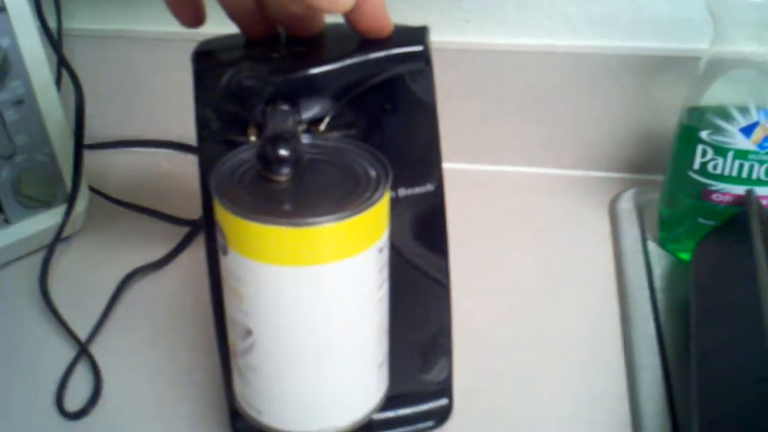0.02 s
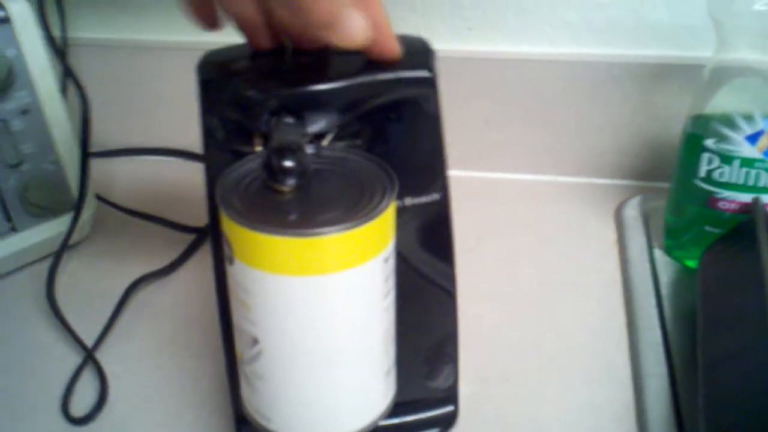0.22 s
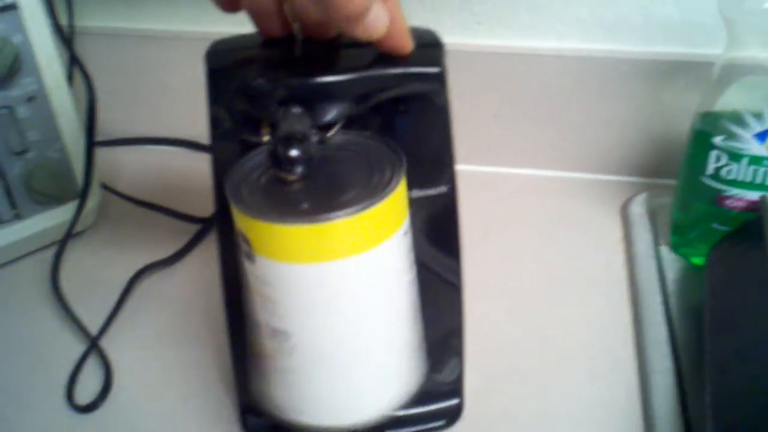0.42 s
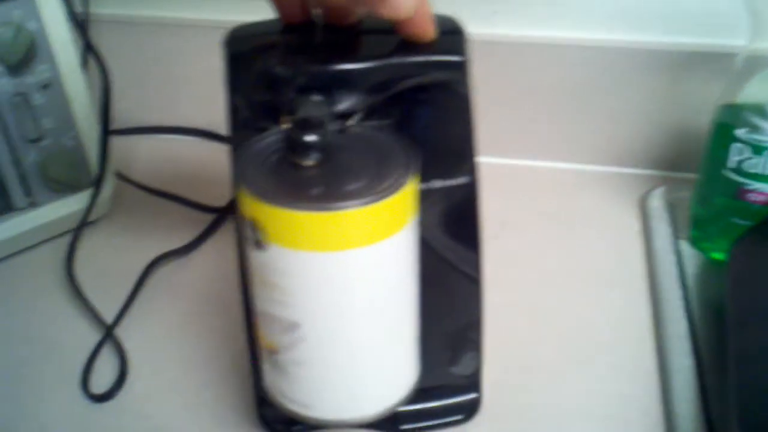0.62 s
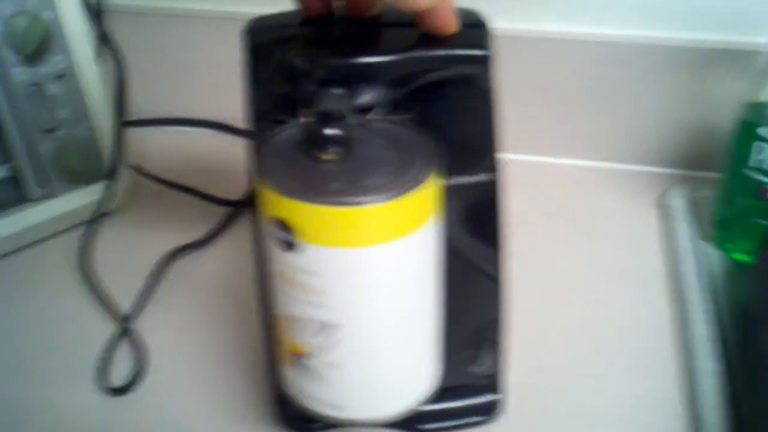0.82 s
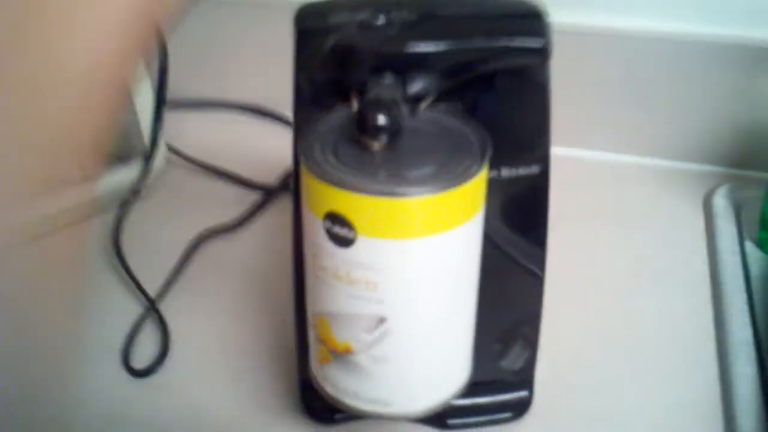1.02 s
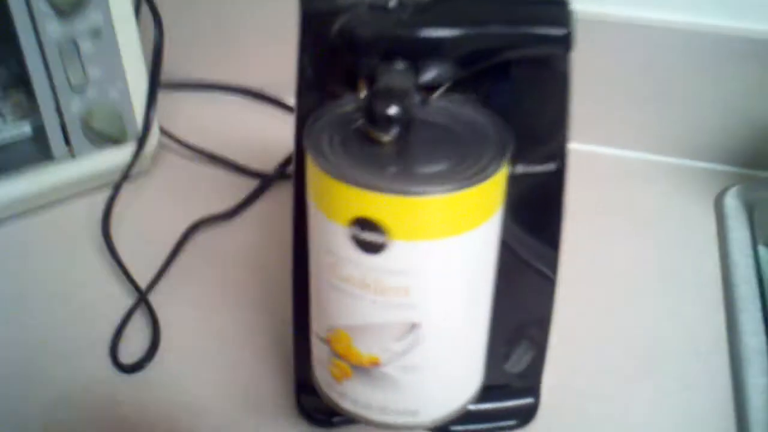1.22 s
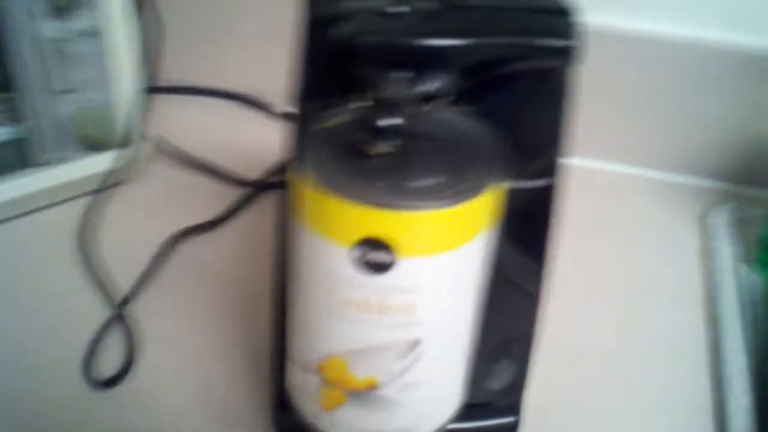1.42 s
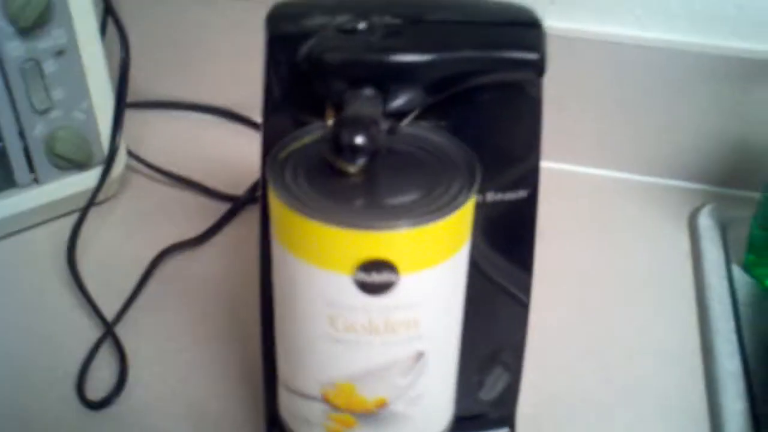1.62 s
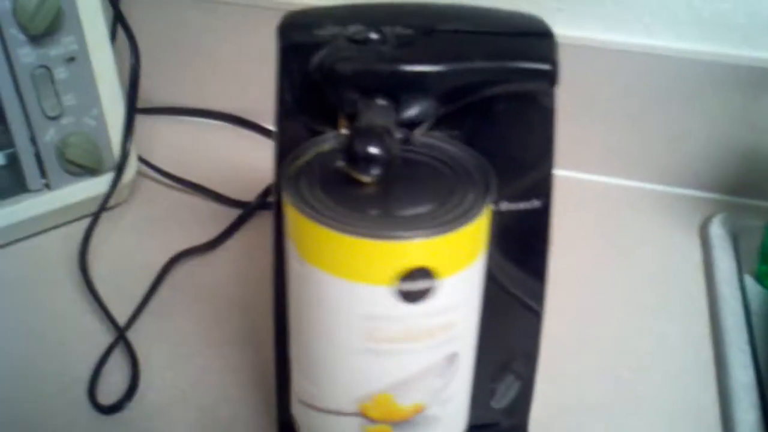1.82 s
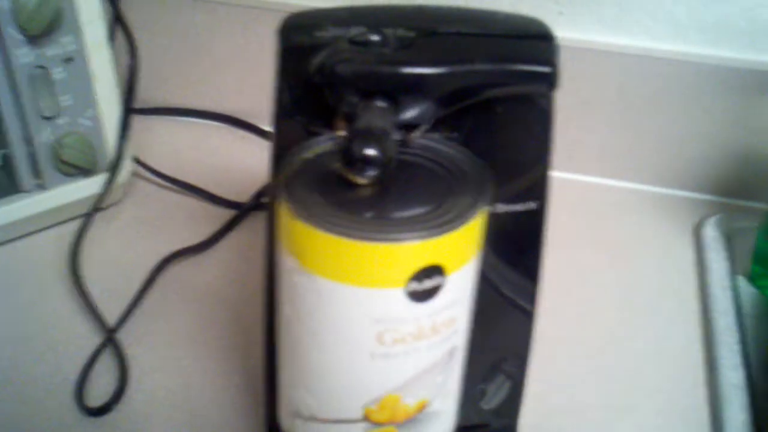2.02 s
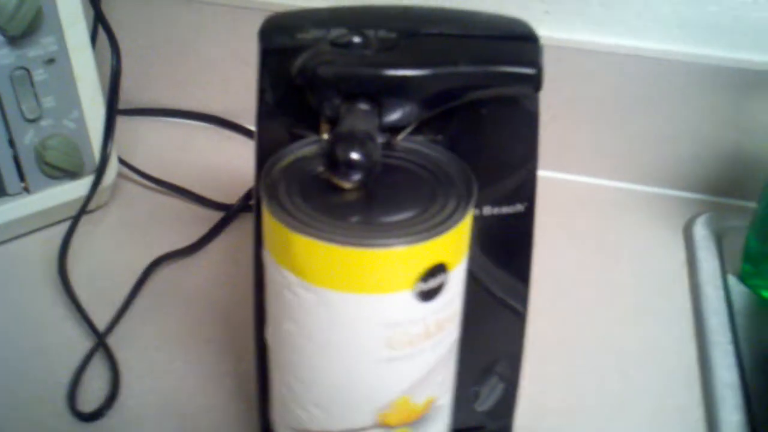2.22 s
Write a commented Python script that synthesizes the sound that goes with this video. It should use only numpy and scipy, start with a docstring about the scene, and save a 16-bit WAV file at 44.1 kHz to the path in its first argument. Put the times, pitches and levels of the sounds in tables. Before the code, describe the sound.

An electric can opener clunks, then hums and grinds steadily around a can.

```python
"""Electric can opener, close by.

The lever bumps and clicks down, the motor labours, and the blade crunches through the lid.
Mains hum, rotor tones and grinding gears then run steadily while the can turns,
with a few knocks ringing the housing and can, until the sound stops short."""
import sys
import numpy as np
from scipy import signal
from scipy.fft import rfft, irfft
from scipy.io import wavfile
from scipy.ndimage import uniform_filter1d

SR = 44100
rng = np.random.default_rng(int(sys.argv[2]) if len(sys.argv) > 2 else 0)


def inscribe(sig):
    """Save sig as 16-bit PCM at rate SR to the path in sys.argv[1].

    A 1-D sig is mono; a 2-D sig holds one channel per row.
    Samples are clipped to [-1, 1] before scaling.
    """
    pcm = np.round(np.clip(np.atleast_2d(sig).T, -1, 1) * 32767)
    wavfile.write(sys.argv[1], SR, pcm.astype(np.int16))


N = 105840
TIME_S = np.arange(N) / SR
BINS_HZ = np.fft.rfftfreq(N, 1 / SR)
HUM_HZ, ROTOR_HZ = 120, 55.18  # magnetic pull at twice the mains frequency; full rotor speed

# Lever, blade and can knocks. Each row: start in seconds, thud in dB, clank in dB, tick in dB.
KNOCKS = [(0.087, -67.5, -48, -68), (.103, -54.5, -46, -60), (0.16, -49, -48, -45), (.194, -57, -54, -54),
          (0.204, -43, -57.5, -47.5), (0.214, -34.5, -41.5, -65), (.356, -22, -21.5, -34),
          (0.772, -41.5, -41.5, -32), (1.704, -44.5, -34, -31), (2.055, -45, -32, -46)]
# Each row: frequency in Hz, phase lead of left over right in radians.
LEFT_LEAD_RAD = [(0, 0), (278, 0), (295, -1.5), (305, -.3), (322, 1.1), (334, -.4), (360, .2), (600, 0),
                 (1550, 0), (2450, -3.14), (2820, -3.14), (3700, -6.28), (4200, -6.28), (5200, -9.42),
                 (14200, 12.4)]
# Each row: frequency in Hz, level of left over right in dB.
BALANCE_DB = [(30, 0.5), (100, 5.5), (240, 6.5), (292, 8.5), (305, 3.5), (335, 2.5), (440, 5), (690, 3.5),
              (1270, -1), (2340, -2.5), (8000, 1)]


def amp(db):
    """Decibels to gain."""
    return 10 ** (np.asarray(db) / 20)


def unit(x):
    """Scale to unit rms."""
    return x / np.sqrt(np.mean(x ** 2) + 1e-20)


def lookup(table, hz=BINS_HZ):
    """Interpolate a table over log frequency."""
    points_hz, values = np.transpose(table)
    return np.interp(np.log(hz + 1), np.log(points_hz + 1), values)


def envelope(table, column=1):
    """Gain over time from a dB column, silent before the first row."""
    columns = np.transpose(table)
    return amp(np.interp(TIME_S, columns[0], columns[column], left=-120))


def strike(start_s, db, decay_s):
    """Envelope of a blow: instant attack, exponential decay."""
    return amp(db) * (TIME_S >= start_s) * np.exp(-abs(TIME_S - start_s) / decay_s)


def drift(rate_hz):
    """Smooth random motion, unit rms."""
    return unit(irfft(rfft(rng.standard_normal(N)) * np.exp(-(BINS_HZ / rate_hz) ** 2), N))


def noise():
    """Two independent white noises."""
    return rng.standard_normal((2, N))


def radiate(drive, colour):
    """Filter two noise streams at constant power and spread them in stereo."""
    # Each row: frequency in Hz, left-right correlation from 0 to 1.
    correlation = [(30, 0.32), (120, 0.61), (600, 0.49), (1300, 1), (2000, 0.41), (2420, 1), (2880, 1),
                   (3300, 0.37), (3900, .93), (4500, 0.76), (14000, .5)]
    common, separate = rfft(drive) * unit(colour)
    share = np.clip(lookup(correlation), 0, 1)
    lead_rad = np.interp(BINS_HZ, *np.transpose(LEFT_LEAD_RAD))
    right = (share * common + np.sqrt(1 - share ** 2) * separate) * np.exp(-1j * lead_rad)
    tilt = amp(lookup(BALANCE_DB) / 2)
    return irfft(np.array([common * tilt, right / tilt]), N)


def tone(cycles, hz, db, balance_db, waver=.11):
    """Stereo sine of wavering strength; hz sets only the left-right phase."""
    lag_rad = np.interp(hz, *np.transpose(LEFT_LEAD_RAD)) * np.array([[-1], [2]]) / 3
    strength = amp(db) * np.sqrt(2) * unit(1 + waver * drift(rate_hz=22))
    pan = amp(np.array([[balance_db], [-balance_db]]) / 2)
    return pan * strength * np.sin(2 * np.pi * cycles - lag_rad)


def room():
    """Faint, mostly low kitchen noise."""
    # Each row: frequency in Hz, relative density in dB.
    spectrum = [(25, -9.5), (80, -3.5), (150, -10), (300, 1), (700, -9.5), (1500, -9.5), (3000, -17.5),
                (14000, -25.5)]
    return amp(-62.5) * radiate(noise(), amp(lookup(spectrum)))


def lever():
    """Pressing the lever bumps the opener against the counter."""
    # Each row: frequency in Hz, relative density in dB.
    spectrum = [(30, -22), (70, -9), (95, 0.5), (140, -13.5), (230, -6.5), (500, -16.5), (1500, -39),
                (8000, -65)]
    return radiate(noise() * strike(start_s=.13, db=-48, decay_s=.032), amp(lookup(spectrum)))


def knocks():
    """Each knock is a housing thud, a can clank and a bright tick."""
    # Spectra. Each row: frequency in Hz, relative density in dB.
    thud = [(60, -33), (120, -12.5), (230, -9.5), (340, -2), (460, 5.5), (650, -10), (2000, -42),
            (8000, -72.5)]
    clank = [(200, -22), (900, -7.5), (1500, 5), (2100, -3.5), (3500, -15.5), (12000, -33)]
    tick = [(300, -14), (2000, 4), (4000, -7), (7000, -6), (14000, -12)]
    starts_s, *part_levels_db = np.transpose(KNOCKS)
    out = np.zeros((2, N))
    for levels_db, spectrum, decay_s in zip(part_levels_db, (thud, clank, tick), (.018, .007, .02)):
        blows = sum(strike(start_s, db, decay_s) for start_s, db in zip(starts_s, levels_db))
        out += radiate(noise() * blows, amp(lookup(spectrum)))
    return out


def ringing():
    """Each thud briefly rings the housing and can."""
    # Each row: frequency in Hz, level relative to the thud in dB, decay in seconds.
    modes = [(460, -3.5, 0.034), (1553, -8, 0.0049)]
    ring = sum(strike(start_s, thud_db + db, decay_s) * np.sin(2 * np.pi * hz * (TIME_S - start_s))
               for start_s, thud_db, *_ in KNOCKS for hz, db, decay_s in modes)
    return np.sqrt(2) * ring


def puncture():
    """The blade tears the lid: quick cracks merge into one crunch."""
    # Each row: start in seconds, level in dB.
    cracks = [(.516, -34), (0.5253, -19), (.5305, -20), (0.536, -20), (0.5469, -20)]
    # Each row: frequency in Hz, relative density in dB.
    spectrum = [(40, -16), (400, -5.5), (900, -7.5), (1350, 4), (1900, 0), (2700, -7), (3800, -4.5),
                (5000, -11.5), (6400, -1.5), (7800, -9), (9200, -1.5), (14000, -5)]
    tear = np.sqrt(sum(strike(start_s, db, decay_s=.012) ** 2 for start_s, db in cracks))
    return radiate(noise() * tear, amp(lookup(spectrum)))


def housing():
    """The housing groans and the hum deepens while the blade is forced in."""
    # Each row: centre in Hz, width in Hz, level at full strain in dB.
    resonances = [(108, 14, -46), (310, 65, -40.5), (459, 45, -37.5), (535.3, 27, -37)]
    # Each row: time in seconds, gain in dB.
    strain = [(.19, -43), (.22, -8), (.28, 0), (.37, -3), (.46, 0), (.57, -2), (.63, -2), (.82, -5),
              (.95, -15), (2.12, -24)]
    groan = sum(amp(db) * radiate(noise(), 1 / (1 + (2 * (BINS_HZ - hz) / width_hz) ** 2))
                for hz, width_hz, db in resonances)
    load_hum = tone(HUM_HZ * TIME_S, HUM_HZ, db=-40, balance_db=lookup(BALANCE_DB, HUM_HZ))
    return envelope(strain) * (groan - load_hum)  # minus: in phase with the motor's hum


def scrape(drive):
    """Scraping brightens in short patches; the casing adds many narrow resonances."""
    patch_db, patch_hz, patch_s = 1.94, 603.4, .03
    ripple_db, ripple_hz = 2.5, 45
    hz, frames_s, cells = signal.stft(drive, SR, nperseg=256)
    patches = uniform_filter1d(rng.standard_normal(cells.shape[1:]), round(patch_hz / hz[1]), axis=0)
    patches = unit(uniform_filter1d(patches, round(patch_s / frames_s[1]), axis=1))
    treble_weight = np.minimum(hz / 3500, 1)[:, None]
    _, patchy = signal.istft(cells * amp(patch_db * patches * treble_weight), SR, nperseg=256)
    ripple = unit(uniform_filter1d(rng.standard_normal(len(BINS_HZ)), round(ripple_hz / BINS_HZ[1])))
    return unit(irfft(rfft(patchy[:, :N]) * amp(ripple_db * ripple), N))


def gears(turns):
    """Teeth rub once per mesh, with specks of grit; the housing rumbles along."""
    # Each row: time in seconds, rumble gain in dB, grinding gain in dB.
    effort = [(.195, -40, -32), (.21, -6, -21), (.245, 9, -4.5), (.265, -8, -0.5), (.37, 6, 4),
              (.44, 4.5, 2.5), (.5, 0.5, 1.5), (.6, 4.5, 1.5), (.85, 3, 0), (1.4, 1.5, 1), (1.72, 2.5, 1),
              (2.12, 1.5, 1)]
    # Spectra. Each row: frequency in Hz, relative density in dB.
    rumble_spectrum = [(25, -35.5), (70, -30.5), (110, -10.5), (150, -18), (220, -8), (320, -3.5),
                       (385, -5.5), (440, -1.5), (570, -4), (650, -17), (1200, -41.5), (4000, -66.5)]
    grind_spectrum = [(150, -25.5), (640, -5), (720, 5.5), (850, 3), (980, 0), (1200, 1.5), (2000, -3),
                      (2350, -5.5), (2670, -3), (2900, 1), (3500, -7), (4400, -11), (5500, -9.5),
                      (6500, -8), (8000, -10.5), (9500, -16.5), (11500, -12.5), (12000, -18), (14000, -19)]
    teeth, flicker_db = 8, .45
    grit_per_s, grit_spread_db, grit_decay_s = 410, 4, .001
    mesh = 1 + .15 * np.cos(2 * np.pi * teeth * turns)
    once_per_turn = 1 + .09 * np.cos(2 * np.pi * turns)
    rub = unit(mesh * once_per_turn * amp(flicker_db * drift(rate_hz=70)))
    hits = rng.random(N) < grit_per_s / SR
    specks = hits * amp(grit_spread_db * np.minimum(rng.exponential(1, N), 4))
    grit = unit(signal.lfilter([1], [1, -np.exp(-1 / (grit_decay_s * SR))], specks))
    grind = radiate(scrape(noise() * rub + .3 * noise() * grit), amp(lookup(grind_spectrum)))
    rumble = radiate(noise() * rub, amp(lookup(rumble_spectrum)))
    return amp(-38) * rumble * envelope(effort, column=1) + amp(-35) * grind * envelope(effort, column=2)


def rotor_turns():
    """Running turn count: the rotor spins up, sags under the first cut and wanders slightly."""
    start_s, spin_up_s, wander_hz = .2, .03, .066
    sag_depth_hz, sag_at_s, sag_width_s = .3947, .777, .2197
    spin_up = 1 - np.exp(-np.maximum(TIME_S - start_s, 0) / spin_up_s)
    sag_hz = sag_depth_hz * np.exp(-((TIME_S - sag_at_s) / sag_width_s) ** 2)
    return np.cumsum(spin_up * (ROTOR_HZ - sag_hz + wander_hz * drift(rate_hz=7.8))) / SR


def motor(turns):
    """Magnetic hum with gear and rotor tones; each turn pushes the hum early and late, so it purrs."""
    # Each row: multiple of HUM_HZ, level in dB, left over right in dB.
    hum_harmonics = [(1, -49.5, 4), (2, -23.5, 3.5), (3, -32.5, 8), (4, -53.5, 1.5), (5, -51.5, 4.5)]
    # Each row: frequency at full speed in Hz, level in dB.
    gear_tones = [(278.4, -44), (333.4, -39.5), (343.2, -40), (398.4, -49), (453.4, -48), (110.4, -56),
                  (535, -51), (715, -53), (824, -55), (977.4, -50), (1004.7, -53)]
    # Rotor harmonics and hum sidebands. Each row: rotor multiple, hum multiple, level in dB.
    rotor_tones = [(1, 2, -31), (-1, 3, -32.5), (-3, 4, -42), (8, -1, -35.5), (4, 1, -38), (2, 2, -45),
                   (8, 0, -41), (15, 1, -43.5), (18, 0, -47), (5, 0, -46), (1, 3, -47), (-1, 4, -46),
                   (-3, 5, -47), (8, 1, -48), (4, 0, -50), (15, -1, -49.5), (16, 0, -52), (19, 0, -55),
                   (20, 0, -56), (21, 0, -55), (24, 0, -51), (25, 0, -54), (28, 0, -58), (30, 0, -57),
                   (32, 0, -52)]
    # Each row: time in seconds, hum gain in dB, gear and rotor gain in dB.
    run_gains = [(.2, -17, -24), (.28, -12.5, -5.5), (.36, -1, -5.5), (.51, -7, -5), (.58, -4.5, -9),
                 (.66, -1.5, -7.5), (.82, 1, -3), (1.15, 0, 0.5), (1.65, 0, -0.5), (2.12, 0, -2.5)]
    hum_cycles = HUM_HZ * TIME_S
    hum = sum(tone(k * hum_cycles + (k == 1) / 2, k * HUM_HZ, db, balance_db, waver=.058)
              for k, db, balance_db in hum_harmonics)
    partials = [(turns * hz / ROTOR_HZ + rng.random(), hz, db) for hz, db in gear_tones]
    for rotor_k, hum_k, db in rotor_tones:
        # Nearest sidebands take opposite signs for an even purr.
        offset_cycles = (rotor_k < 0) / 2 if abs(rotor_k) == 1 else rng.random()
        cycles = rotor_k * turns + hum_k * hum_cycles + offset_cycles
        partials.append((cycles, rotor_k * ROTOR_HZ + hum_k * HUM_HZ, db))
    whirr = sum(tone(cycles, hz, db, lookup(BALANCE_DB, hz)) for cycles, hz, db in partials)
    return hum * envelope(run_gains, column=1) + whirr * envelope(run_gains, column=2)


def scene():
    """The opener in a quiet kitchen."""
    turns = rotor_turns()
    return motor(turns) + gears(turns) + housing() + lever() + knocks() + ringing() + puncture() + room()


def record(dry):
    """Abrupt stop, then a low-pass."""
    stop_s, fade_s, cutoff_hz = 2.127, .003, 14100
    gate = np.clip((stop_s - TIME_S) / fade_s, 0, 1)
    low_pass = signal.firwin(511, cutoff_hz, window=("kaiser", 9), fs=SR)
    return signal.oaconvolve(dry * gate, low_pass[None], "same")


dry = scene()
out = record(dry)
inscribe(out)
```